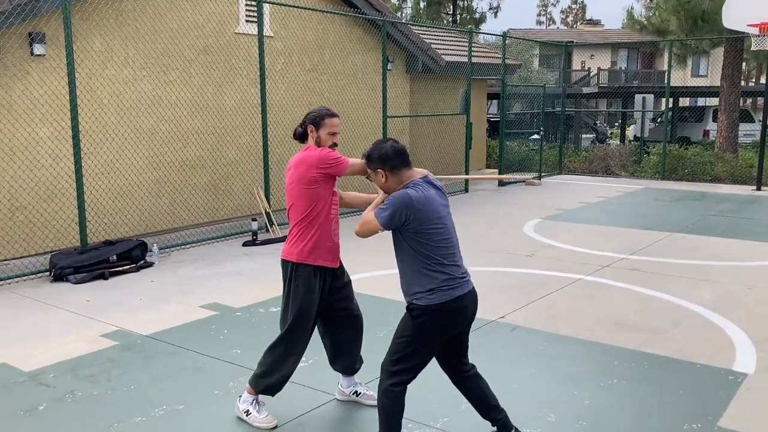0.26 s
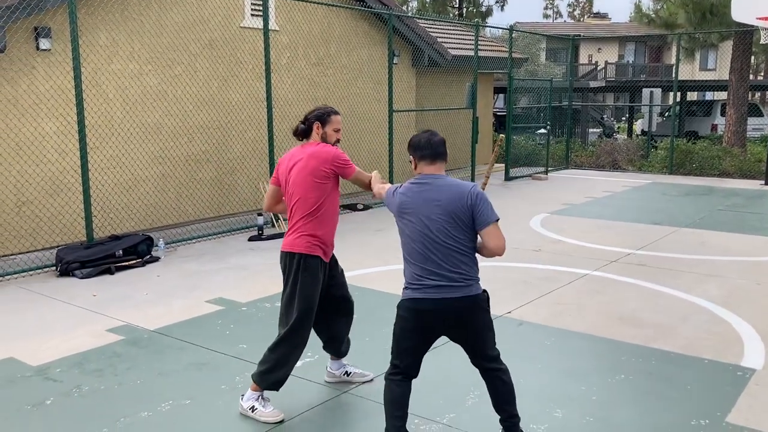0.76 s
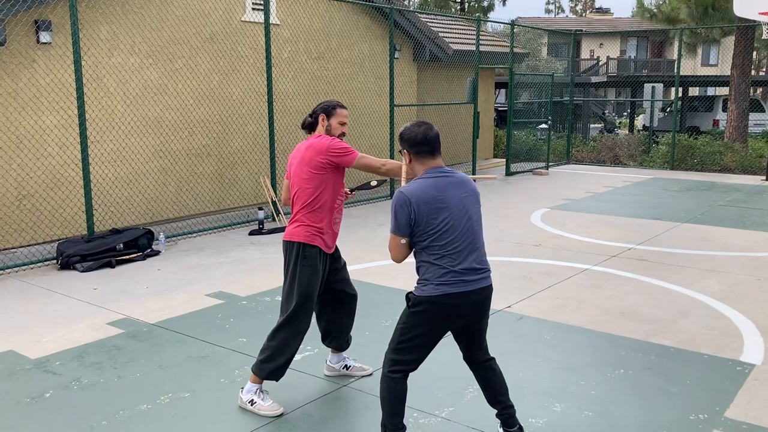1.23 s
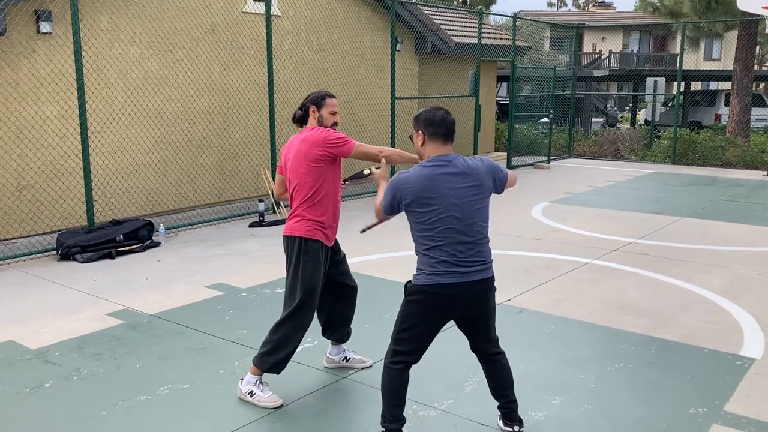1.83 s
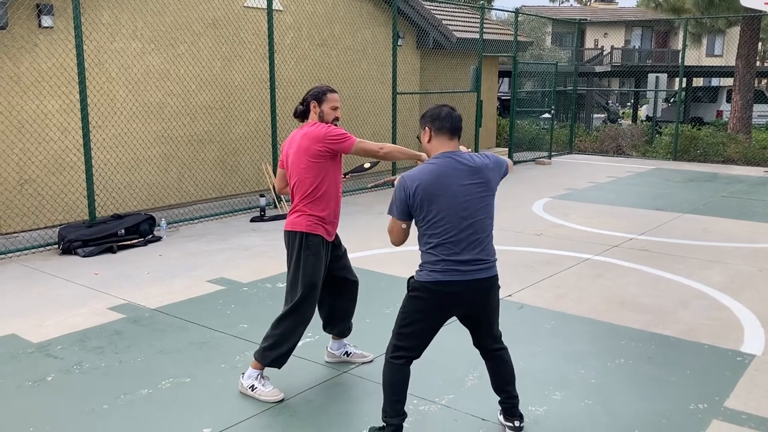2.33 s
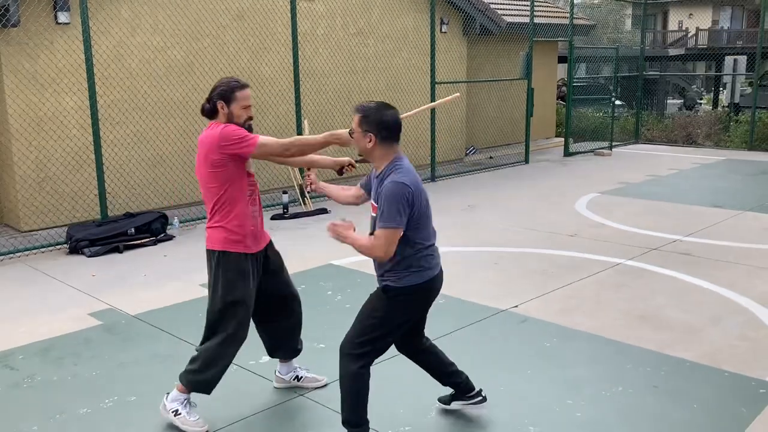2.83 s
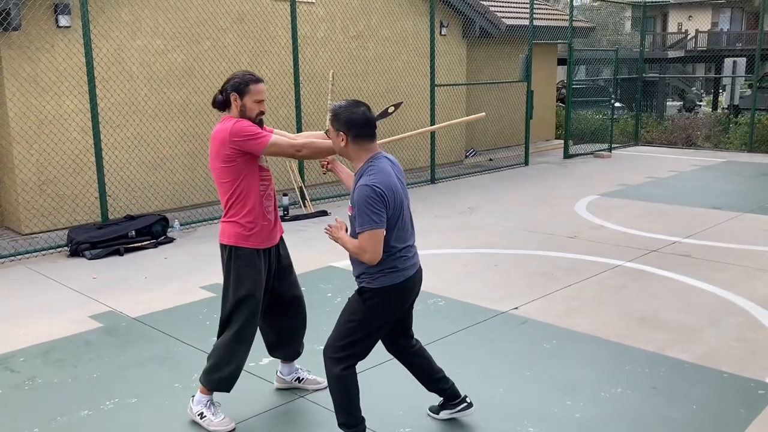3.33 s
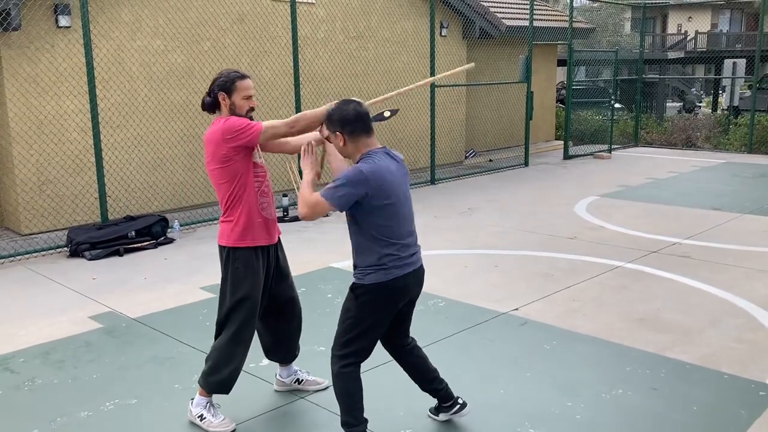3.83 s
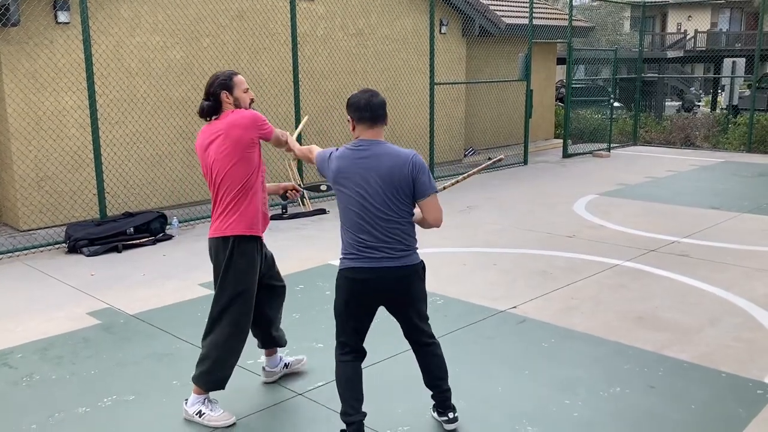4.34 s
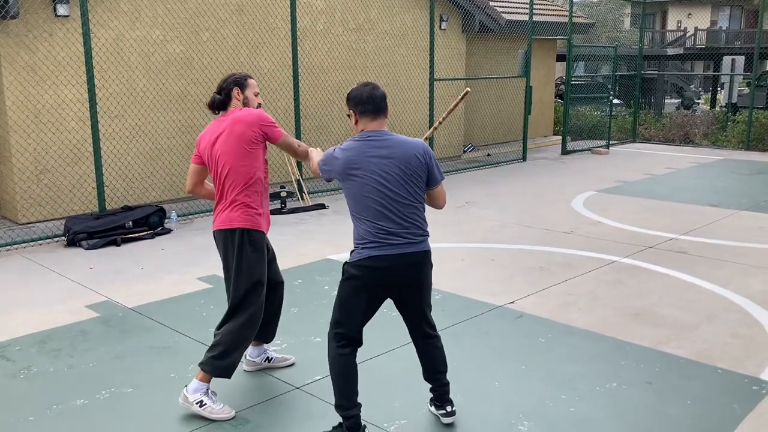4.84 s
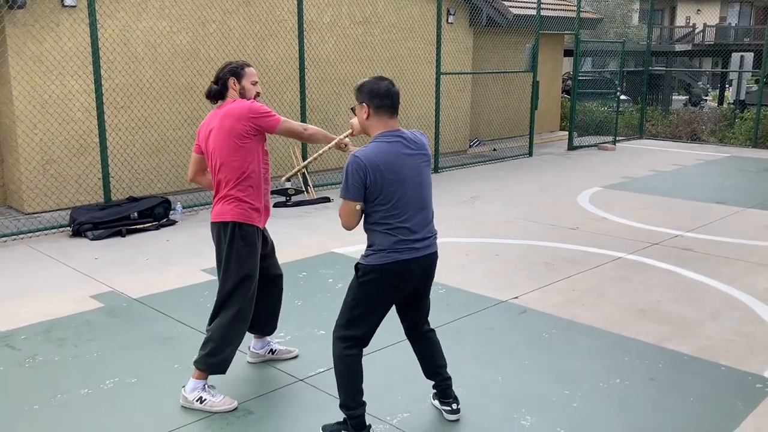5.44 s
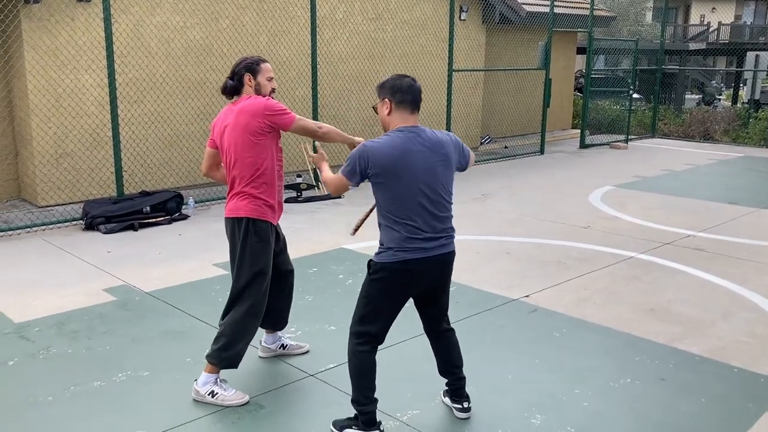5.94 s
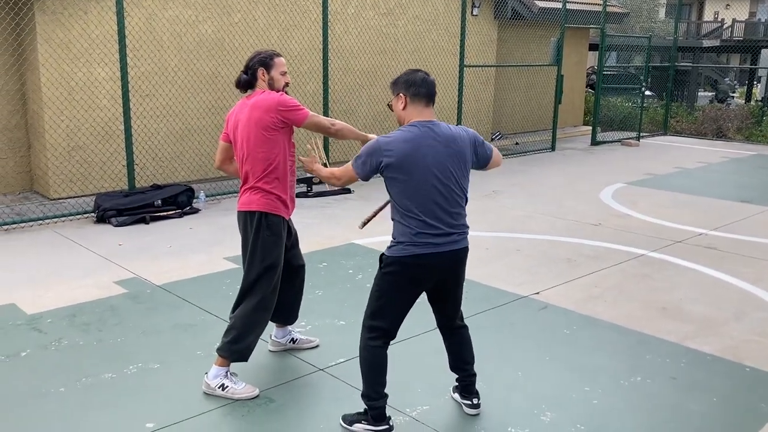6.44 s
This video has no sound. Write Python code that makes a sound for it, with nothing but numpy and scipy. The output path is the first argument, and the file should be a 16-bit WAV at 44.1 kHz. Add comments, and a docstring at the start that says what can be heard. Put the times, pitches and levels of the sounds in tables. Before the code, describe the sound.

An open hard court in stereo, sticks close to the microphone. A faint coloured hiss fades during the first second over deep traffic rumble and a wavering low engine drone. Cloth swishes softly at 0.3 s; a light graze ticks at 0.6. At 0.8 a quick cluster of dull wooden knocks lands with heavy, soft thuds. Faint sliding ticks follow at 1.2, 1.5 and 2.2. Near 2.6 the background drops for an instant; the engine is gone and the road returns louder, then settles. Bright ticks at 2.65 lead to one very loud, sharp clack at 2.79, with low thumps, a wall slap and short tail. Smaller clacks come at 2.86 and 2.95. Shoes scrape and clothes rustle until another tight cluster at 4.45-4.5, with thumps. Weak ticks at 5.2, 5.55 and 6.2 end it. Tiny distant birds whistle occasionally, clearest at 3.5.

```python
"""Two people spar with wooden sticks on an outdoor court, heard in stereo close by.
At the start a faint coloured hiss fades out; traffic rumbles as filtered noise, a distant engine drones as two sines.
Cloth and soles then swish (noise swells), sticks tick and knock (noise bursts, damped modes), a wall answers,
arms and feet thud (damped sines) and small birds call far off (fluttering sines).
At 2.6 s the background dips briefly; the engine is gone and the traffic louder. Then comes one hard clack."""
import sys
import numpy as np
from scipy import signal
from scipy.fft import rfft, irfft, next_fast_len
from scipy.io import wavfile
from scipy.ndimage import uniform_filter1d, map_coordinates

SR = 44100
rng = np.random.default_rng(int(sys.argv[2]) if len(sys.argv) > 2 else 0)


def materialize(psi):
    """Save the field psi as 16-bit PCM at rate SR to the path in sys.argv[1].

    A 1-D psi becomes a single channel; in a 2-D psi each row is a channel.
    """
    bounded = np.clip(np.atleast_2d(psi).T, -1, 1)
    quanta = np.round(bounded * 32767).astype(np.int16)
    wavfile.write(sys.argv[1], SR, quanta)


N = 294588


def amp(db):
    """Decibels to gain."""
    return 10 ** (np.asarray(db) / 20)


def unit(x):
    """Scale to rms 1."""
    return x / np.sqrt(np.mean(x ** 2) + 1e-20)


def along(points, hz):
    """Read a curve of (Hz, value) points on a log frequency axis."""
    f, v = np.transpose(points)
    return np.interp(np.log(hz + 1), np.log(f + 1), v)


def clock():
    """The time of each sample in seconds."""
    return np.arange(N) / SR


def curves(rows):
    """One value per sample for each column after the time."""
    s, *columns = np.transpose(rows)
    return [np.interp(clock(), s, column) for column in columns]


def wobble(rate):
    """A smooth random curve with rate knots a second."""
    t = clock()
    coarse = t[::16]  # the spline is read at every 16th sample
    knots = rng.standard_normal(int(N * rate / SR) + 4)
    return np.interp(t, coarse, map_coordinates(knots, [coarse * rate]))


def filtered(x, response):
    """Multiply the spectrum of x by a response of frequency."""
    size = next_fast_len(N + SR // 2)
    hz = np.fft.rfftfreq(size, 1 / SR)
    return irfft(rfft(x, size) * response(hz), size)[..., :N]


def pulse(spectrum, size=2048):
    """The shortest causal (minimum-phase) pulse with this spectrum, of energy 1."""
    hz = np.fft.rfftfreq(size, 1 / SR)
    cepstrum = irfft(np.log(amp(along(spectrum, hz))))
    # folding the cepstrum onto positive times moves the energy to the front
    cepstrum[1:size // 2] *= 2
    cepstrum[size // 2 + 1:] = 0
    h = irfft(np.exp(rfft(cepstrum)))
    return h / np.linalg.norm(h)


def add(track, s, sound):
    """Mix a sound in at time s."""
    part = track[..., round(s * SR):][..., :sound.shape[-1]]
    part += sound[..., :part.shape[-1]]


def rush(spectrum, alike, patchy_db):
    """Stereo noise of rms 1 with patches of random gain in time and pitch."""
    z = signal.stft(rng.standard_normal((2, N)), nperseg=512)[2]
    field = uniform_filter1d(rng.standard_normal(z.shape[1:]), size=6, axis=0)
    field = uniform_filter1d(field, size=14, axis=1)
    pair = signal.istft(z * amp(patchy_db * unit(field)), nperseg=512)[1][:, :N]

    def mid_side(hz):
        # the angle that gives left and right the wanted likeness
        turn = np.arccos(np.clip(along(alike, hz), -1, 1)) / 2
        return amp(along(spectrum, hz)) * [np.cos(turn), np.sin(turn)]

    mid, side = filtered(pair, mid_side)
    return unit(np.array([mid + side, mid - side]))


# The faint hiss at the start. Each row: frequency in Hz, spectrum level in dB.
GLOW = [(700, -12.5), (1700, 5.5), (2800, -2), (4300, -6), (5500, -25), (7000, -15.5), (12000, -47)]


def opening_hiss():
    """A faint, coloured noise fades out from the start, by 60 dB in 1.03 s."""
    return amp(-56.5 - 60 * clock() / 1.03) * rush(GLOW, [(500, 0.16)], patchy_db=0)


# Spectra of the road's rumble, motor roar and tyre hiss. Each row: frequency in Hz, shape in dB per Hz.
RUMBLE = [(20, -26.5), (30, -12), (43, 1), (80, 4.5), (130, -2), (190, -11.5), (300, -36), (600, -64)]
ROAR = [(80, -23.5), (150, -3.5), (200, 1), (260, -2), (350, -9), (500, -16), (1000, -54)]
TYRES = [(200, -34.5), (350, -15.5), (500, -16.5), (780, -15), (1200, -21.5), (1900, -26), (3100, -37.5),
         (4400, -42), (5400, -47.5), (8000, -46.5), (12000, -51.5), (16000, -61)]
# How alike the road is at left and right. Each row: frequency in Hz, likeness from -1 to 1.
ALIKE = [(60, 0.96), (150, 0.96), (380, 0.58), (950, -0.072), (2380, 0.04), (5980, -0.15), (15000, 0.07)]
# Before the dip the road has less deep bass and less edge. Each row: frequency in Hz, gain in dB.
EARLY_COLOUR = [(45, -4), (90, 1.5), (1400, -0.5), (2500, -3.5), (5000, 1)]
# rumble, roar and hiss in dB, ahead of the dip's gain, the colour and the left-right balance
ROAD_BEFORE, ROAD_AFTER = (-44.5, -56.5, -63), (-44, -50.5, -56)
EASE_DB_PER_S = 0.34  # each stretch eases slowly throughout
SURGE_DB, SURGE_S = (2, 4, 7.5), 0.59  # just after the dip each layer is louder, then settles


def traffic():
    """Road noise: deep rumble nearly the same on both sides, the roar of motors and a wider wash of tyres."""
    t = clock()
    after = t > DIP_BOTTOM_S
    age = t - after * DIP_BOTTOM_S
    levels = []
    for early, late, surge in zip(ROAD_BEFORE, ROAD_AFTER, SURGE_DB):
        settling = late + surge * np.exp(-age / SURGE_S)
        levels.append(np.where(after, settling, early) - EASE_DB_PER_S * age)
    rumble_db, roar_db, hiss_db = levels
    rumble = amp(rumble_db + .8 * wobble(7)) * rush(RUMBLE, ALIKE, patchy_db=0.7)
    roar = amp(roar_db) * rush(ROAR, ALIKE, patchy_db=2.5)
    hiss = amp(hiss_db + 0.74 * wobble(4)) * rush(TYRES, ALIKE, patchy_db=1.6)
    road = rumble + roar + hiss
    early_road = filtered(road, lambda hz: amp(along(EARLY_COLOUR, hz)))
    return np.where(after, road, early_road)


# The distant engine. Each row: time in seconds, firing rate in Hz, relative level in dB.
ENGINE = [(0.0, 75.9, -46.5), (0.16, 90.8, -44.5), (0.23, 91.34, -31.5), (0.38, 89.5, -42.5),
          (0.59, 91.35, -41.5), (0.65, 89.3, -53.5), (0.8, 85.1, -40), (0.84, 76.55, -34), (0.9, 72.4, -47),
          (0.98, 89.42, -37), (1.56, 88.25, -39), (1.62, 87.17, -32), (2.27, 64, -38), (2.6, 73.4, -31.5)]


def engine():
    """A distant exhaust drones on its wandering firing rate, with a faint octave, and fades into the dip."""
    hz, db = curves(ENGINE)
    phase = 2 * np.pi * np.cumsum(hz * (1 + 0.025 * wobble(24.423))) / SR
    tone = np.sin(phase) + amp(-25.5) * np.sin(2 * phase)
    fade = np.clip((DIP_BOTTOM_S - clock()) / 0.011, 0, 1)
    return amp(db - 2.0 + 1.4 * wobble(22)) * unit(tone) * fade


# Steps and turns between the contacts, close by.
# Each row: time of the top in seconds, half length in seconds, cloth level in dB, grit level in dB.
MOVES = [(0.282, .025, -57.5, -61.5), (0.358, 0.041, -66, -65.5), (0.621, 0.057, -60.5, -70),
         (2.755, 0.047, -48.5, -66), (2.999, .045, -52.5, -75), (3.158, 0.052, -86, -65.5),
         (3.768, 0.095, -71, -66), (3.995, 0.054, -60.5, -67.5), (4.116, 0.052, -61.5, -85.5),
         (4.311, .053, -61.5, -67), (4.548, 0.1, -79, -64)]
# Spectra of rubbing cloth and of grit under the soles. Each row: frequency in Hz, shape in dB.
CLOTH = [(300, -17), (1000, -1.5), (3000, -3.5), (5500, -3), (7500, 2.5), (11500, 0), (16000, -6)]
GRIT = [(700, -15), (1500, 2), (2800, -4), (4100, 2.5), (5200, -8), (9000, -22), (16000, -36.5)]
# sleeves and soles rub just after every contact; levels are relative to the contact
RUB_LAG_S, RUB_RISE_S, RUB_FALL_S = .018, .016, 0.042
BLOCK_RUB_DB, GRAZE_RUB_DB = -21, -20.5
RUB_GRIT_DB = 0.5  # grit relative to cloth


def swishes():
    """Each contact and quick move rubs cloth, a fine hiss, and grinds grit under the soles, a coarser crackle."""
    t = clock()
    rubs = [(s, db + BLOCK_RUB_DB) for s, db, *_ in BLOCKS]
    rubs += [(s, db + GRAZE_RUB_DB) for s, db in GRAZES]
    strokes = [(s + RUB_LAG_S, RUB_RISE_S, RUB_FALL_S, db, db + RUB_GRIT_DB) for s, db in rubs]
    strokes += [(s, half, half, cloth_db, grit_db) for s, half, cloth_db, grit_db in MOVES]
    swells = np.array([np.exp(-((t - s) / np.where(t < s, rise, fall)) ** 2)
                       for s, rise, fall, *_ in strokes])
    levels_db = np.array(strokes)[:, 3:].T
    cloth, grit = np.sqrt(amp(levels_db) ** 2 @ swells)  # overlapping strokes add in power
    folds = unit(amp(1.9 * wobble(60) + 1.3 * wobble(700)))
    grains = rng.standard_normal((2, N)) * (rng.random(N) < 1800 / SR)  # about 1800 a second
    crackle = unit(filtered(grains * amp(2.4 * wobble(71)), lambda hz: amp(along(GRIT, hz))))
    hiss = rush(CLOTH, [(500, 0.7), (8000, .1)], patchy_db=5.0)
    return cloth * folds * hiss + grit * crackle


def contact(spectrum, t60, apart):
    """A decaying burst of micro-impacts through a spectrum; rms 1 if packed into 3 ms."""
    t = np.arange(SR // 8) / SR
    grains = rng.standard_normal(len(t)) + apart * rng.standard_normal((2, len(t)))
    decaying = grains * amp(-60 * t / t60)
    burst = signal.fftconvolve(decaying, pulse(spectrum)[None], axes=1)[:, :len(t)]
    return unit(burst) * np.sqrt(.003 * SR / len(t))


# Bending modes of a stick. Each row: frequency in Hz, relative level in dB, time to fall 60 dB in seconds.
WOOD = [(275, -0.5, .055), (402, 2.5, 0.033), (612, -7.5, 0.057), (783, -1.5, 0.035), (1136, -4.5, 0.026),
        (1660, -7, 0.025), (2045, -0.5, 0.02), (2450, 4.5, .016), (2549, 1, 0.027), (3000, -8, 0.016),
        (3600, 0.5, .011), (3800, -1.5, .011), (4200, 0, 0.013), (6900, -18, .01), (11700, -22.5, .008)]


def ring(shift_db, travel):
    """Hand-damped modes of a stick; bending waves are slower at low pitch, so low modes speak later."""
    t = np.arange(SR // 8) / SR
    out = np.zeros(len(t))
    for k, (hz, db, t60) in enumerate(WOOD):
        delay = travel * np.sqrt(WOOD[0][0] / hz)
        age = np.maximum(t - delay, 0)
        out += amp(db + shift_db[k] - 60 * age / t60) * np.sin(2 * np.pi * hz * age)
    return out


# Spectra of a dull knock, a woody clack and a sliding tick. Each row: frequency in Hz, shape in dB per Hz.
KNOCK = [(150, -14.5), (400, -1.5), (750, 2.5), (1100, -6.5), (2000, -18), (4000, -40.5)]
CLACK = [(500, -25.5), (1100, -11.5), (1600, -2.5), (2500, -3.5), (3700, 1.5), (4400, -4), (4900, -21),
         (8000, -24), (16000, -47)]
TICK = [(2500, -24), (5000, -5), (7000, 4), (11500, 0), (16000, -7.5)]
RING_DB = -19  # ring of a light contact relative to its clack
RING_TILT_DB, RING_PIVOT_HZ = 5, 2000  # dB per octave by which a harder touch favours high modes


def touch(knock_db, clack_db, tick_db, t60, octaves):
    """One light contact: a dull knock, a woody clack, the stick's ring, and a bright tick as the sticks slide."""
    tilt_db = RING_TILT_DB * octaves * np.log2(np.array(WOOD)[:, 0] / RING_PIVOT_HZ)
    spot_db = 2 * rng.standard_normal(len(WOOD))  # each spot on the stick favours other modes
    colour = np.array(CLACK) * [2 ** octaves, 1]  # a shorter, harder touch is brighter
    knock = amp(knock_db) * contact(KNOCK, t60=0.0082, apart=0.5)
    stick = amp(RING_DB) * ring(spot_db + tilt_db, travel=0.0013)
    clack = amp(clack_db) * (contact(colour, t60, apart=1.4) + stick)
    tick = amp(tick_db) * contact(TICK, t60, apart=1.0)
    return knock + clack + tick


# Grazes, one stick glancing along the other. Each row: start in seconds, tick level in dB.
GRAZES = [(.592, -43.5), (.596, -47.5), (.623, -57), (1.231, -52), (1.528, -57.5), (2.215, -58.5),
          (2.6541, -29), (2.657, -32.5), (4.456, -44), (4.463, -45), (5.212, -45.5), (5.5534, -45.5),
          (6.2346, -65.5)]
# Blocks, stick against stick or grip. Each row: start in seconds, blow level in dB before its hardness shares,
# hardness from -1 (padded) to 1 (bare wood), slide tick in dB relative to the blow.
BLOCKS = [(.769, -50.5, -0.51, -2.5), (0.796, -44, -.35, -10), (.802, -42.5, -0.56, -12),
          (.826, -54, 0.2, -6), (2.704, -49, -0.92, -23), (2.859, -40, 0.05, 0.5), (2.95, -32.5, 0.31, -12),
          (4.441, -41.5, -0.81, 0), (4.470, -35.5, 0.2, -3), (4.478, -44, 0.46, -12),
          (4.4995, -46.5, 0.63, -16)]
KNOCK_DB, CLACK_DB = 2.5, -2.5  # shares of a block of middling hardness
# harder: less knock, more and brighter clack
KNOCK_DB_PER_HARD, CLACK_DB_PER_HARD, OCTAVES_PER_HARD = -8, 11.5, 1
BLOCK_T60_S, GRAZE_T60_S = 0.021, .025
GRAZE_KNOCK_DB, GRAZE_CLACK_DB = -8.5, -1  # relative to the graze's woody level
GRAZE_USUAL_DB, GRAZE_WOOD_GROWS = -53.5, .66  # wood grows this many dB per dB of tick


def taps():
    """Blocks go from knock to clack with their hardness; grazes are mostly tick."""
    out = np.zeros((2, N))
    for s, db, hard, slide_db in BLOCKS:
        knock_db = db + KNOCK_DB + KNOCK_DB_PER_HARD * hard
        clack_db = db + CLACK_DB + CLACK_DB_PER_HARD * hard
        add(out, s, touch(knock_db, clack_db, db + slide_db, BLOCK_T60_S, OCTAVES_PER_HARD * hard))
    for s, db in GRAZES:
        wood_db = GRAZE_USUAL_DB + GRAZE_WOOD_GROWS * (db - GRAZE_USUAL_DB)
        knock_db, clack_db = wood_db + GRAZE_KNOCK_DB, wood_db + GRAZE_CLACK_DB
        add(out, s, touch(knock_db, clack_db, db, GRAZE_T60_S, octaves=-0.1))
    return out


# Decay of the court. Each row: frequency in Hz, time to fall 60 dB in seconds.
COURT = [(200, 0.54), (1000, .5), (3000, 0.59), (6000, 0.36), (14000, 0.05)]


def court(x):
    """A slap from the wall; many separate echoes from fences and houses merge into an uneven tail."""
    echoes = rng.standard_normal((2, SR // 2)) * amp(3 * wobble(120)[:SR // 2])
    hz, t, z = signal.stft(echoes, SR, nperseg=256)
    decay = amp(-60 * t / along(COURT, hz)[:, None])
    onset = 1 - np.exp(-t / 0.0029)
    tail = signal.istft(z * decay * onset, SR, nperseg=256)[1]
    answer = amp(-20) * tail / np.linalg.norm(tail[0])
    add(answer, .0305, amp([[-26], [-25]]))  # 30.5 ms there and back: a wall about 5 m away
    return signal.fftconvolve(x, answer, axes=1)[:, :N]


# Arms meeting and feet landing, close by.
# Each row: start in seconds, frequency in Hz, level in dB, time to fall 60 dB in seconds.
THUDS = [(0.811, 226, -23.5, 0.062), (0.824, 95, -15, 0.03), (0.837, 199, -24, 0.041),
         (0.86, 54.7, -28, 0.16), (2.803, 81.3, -23.5, 0.092), (2.819, 285, -23.5, 0.048),
         (2.834, 68, -23, 0.15), (4.493, 56.2, -26.5, 0.094), (4.535, 61, -28, 0.096),
         (4.893, 55, -29, 0.082)]


def thuds():
    """Soft, heavy contacts push the air for a few cycles."""
    out, t = np.zeros(N), np.arange(SR // 4) / SR
    onset = 1 - np.exp(-t / .0015)
    for s, hz, db, t60 in THUDS:
        add(out, s, amp(db - 60 * t / t60) * np.sin(2 * np.pi * hz * t) * onset)
    return out


# Small birds far off. Each row: time of the call's top in seconds, pitch in Hz, level in dB.
BIRDS = [(1.106, 4290, -73), (1.656, 4310, -82), (1.84, 3750, -79), (2.444, 4128, -81),
         (3.494, 4424, -63.5), (4.84, 4294, -76.5), (5.003, 3370, -75), (5.53, 4230, -73),
         (6.1, 4380, -75.5), (6.38, 3980, -75.5)]
CALL_S, CALL_TOP_HZ = 0.02, 4370  # half length and pitch of the purest call
# calls further from that pitch are raspier and longer; flutter is a share of the pitch
FLUTTER, FLUTTER_PER_OCTAVE, CALL_S_PER_OCTAVE = 0.0036, 0.27, 0.057


def birds():
    """Thin whistles that swell and fade while their pitch flutters at random."""
    t, out = clock(), np.zeros(N)
    waver = 0.22 * wobble(35) + wobble(370)
    for s, hz, db in BIRDS:
        octaves_off = abs(np.log2(CALL_TOP_HZ / hz))
        length = CALL_S + CALL_S_PER_OCTAVE * octaves_off
        flutter = FLUTTER + FLUTTER_PER_OCTAVE * octaves_off
        near = abs(t - s) < 3 * length
        phase = 2 * np.pi * np.cumsum(hz * (1 + flutter * waver[near])) / SR
        swell = np.exp(-((t[near] - s) / length) ** 2)
        out[near] += amp(db) * swell * np.sin(phase)
    return out


# The background dips briefly, and its first and last gains hold outside. Each row: time in seconds, gain in dB.
DIP = [(2.59, 1), (2.612, -21), (2.63, -12), (2.652, -1)]
DIP_BOTTOM_S = DIP[1][0]


def dip():
    """The gain of the background, which drops for a few hundredths of a second."""
    return amp(curves(DIP)[0])


# The hard strike: the direct pulse, then its reflection from the ground, stronger on the right.
# Each row: start in seconds, level in dB, left over right in dB.
STRIKE = [(2.7872, 2, 4.5), (2.789, 0, -10)]


def strike():
    """The hard blow: a sharp pulse arrives twice, direct and off the ground, and the wood rings."""
    out, start = np.zeros((2, N)), STRIKE[0][0]
    for s, db, pan_db in STRIKE:
        sides = amp(db + np.array([[pan_db], [-pan_db]]) / 2)
        add(out, s, sides * pulse(CLACK))
    add(out, start, amp([[-17], [-18.5]]) * ring(np.zeros(len(WOOD)), travel=0.0033))
    add(out, start, amp(-26.5) * contact(TICK, t60=.008, apart=1.0))
    return out


EAR_LAG_S = .00006  # the sticks are heard first on the left


def scene():
    """The sparring in its court, over the background."""
    lag = np.array([[0], [EAR_LAG_S]])
    sticks = filtered(strike() + taps(), lambda hz: np.exp(-2j * np.pi * hz * lag))
    balance = amp([[-.5], [.5]])  # the background leans right
    background = (traffic() + engine()) * dip() * balance
    return sticks + court(sticks) + opening_hiss() + thuds() + swishes() + birds() + background


# Treble shaping: two dips, near 9 and 14 kHz. Each row: frequency in Hz, gain in dB.
TREBLE = [(7900, 0.5), (9200, -13), (10600, 3), (12200, 0), (14000, -8.5), (15300, -1)]
TOP_HZ = 16200  # steep band limit


def record(dry):
    """The deepest bass is dropped, the treble is shaped by a curve, peaks clip at full scale, the band is limited."""
    thinned = signal.sosfilt(signal.butter(3, 30, "highpass", fs=SR, output="sos"), dry)
    shaped = filtered(thinned, lambda hz: amp(along(TREBLE, hz)))
    clipped = np.clip(shaped, -1, 1)
    return filtered(clipped, lambda hz: 1 / np.sqrt(1 + (hz / TOP_HZ) ** 160))


dry = scene()
out = record(dry)
materialize(out)
```